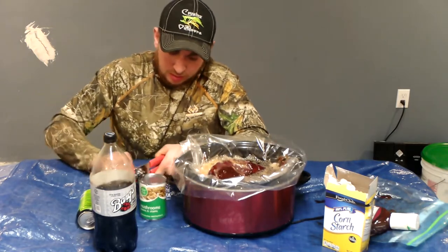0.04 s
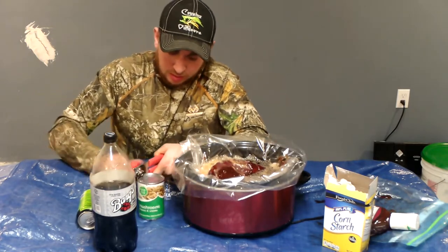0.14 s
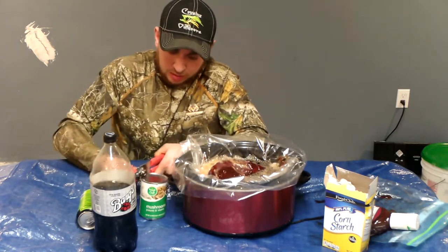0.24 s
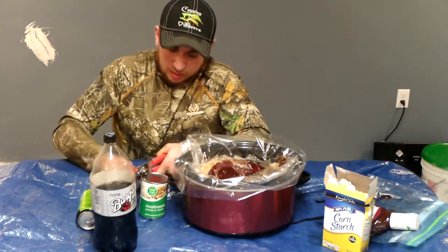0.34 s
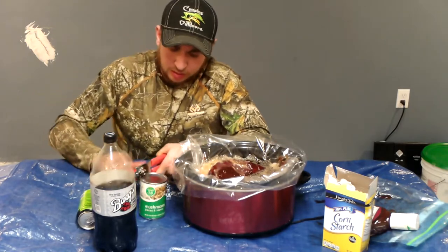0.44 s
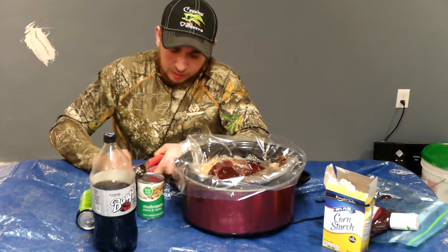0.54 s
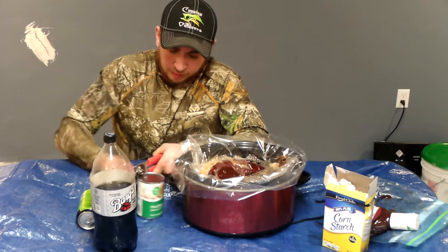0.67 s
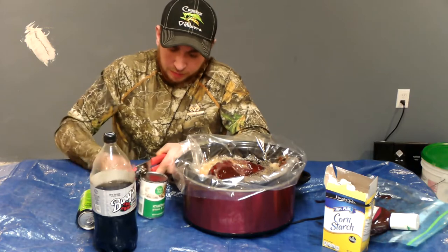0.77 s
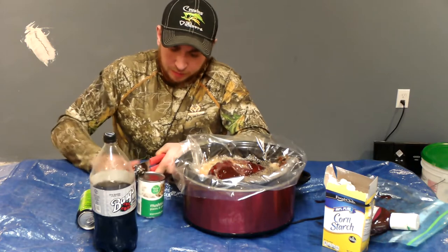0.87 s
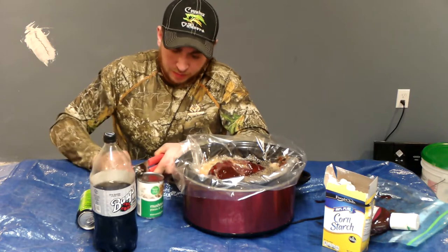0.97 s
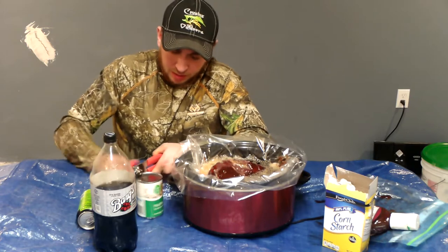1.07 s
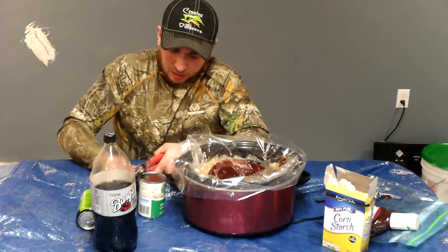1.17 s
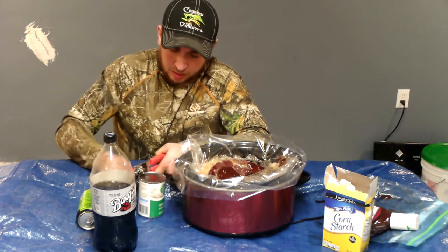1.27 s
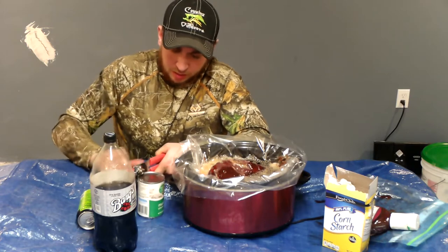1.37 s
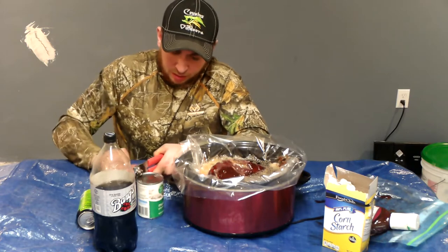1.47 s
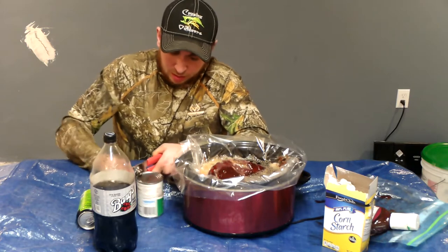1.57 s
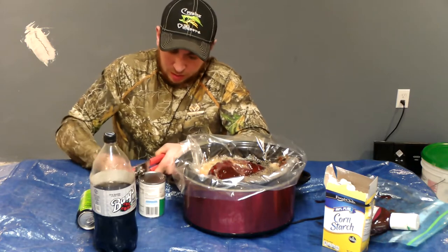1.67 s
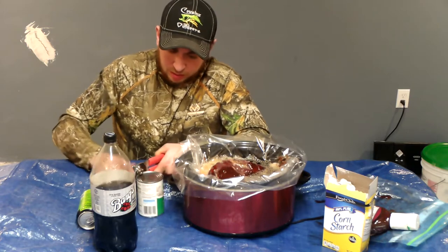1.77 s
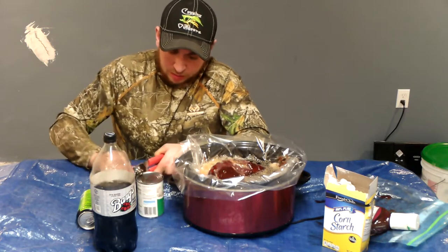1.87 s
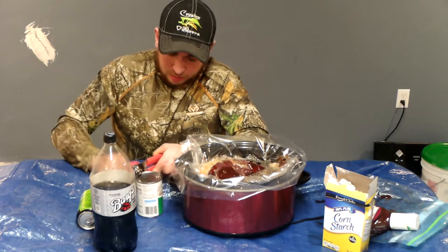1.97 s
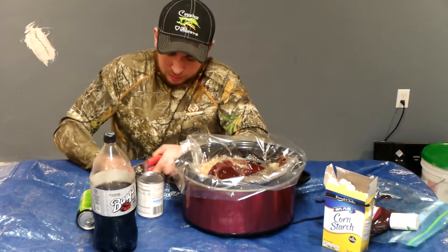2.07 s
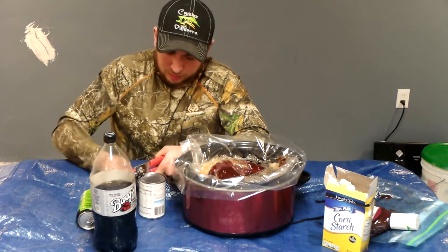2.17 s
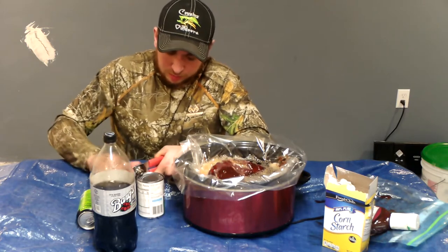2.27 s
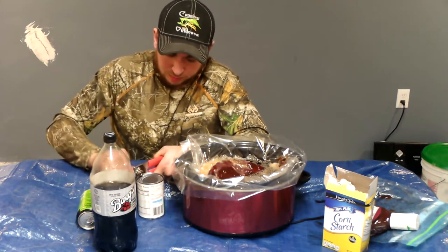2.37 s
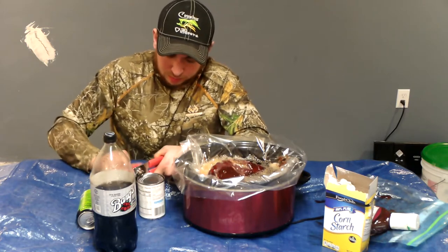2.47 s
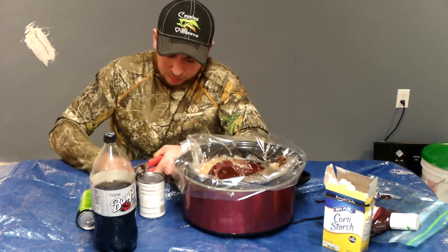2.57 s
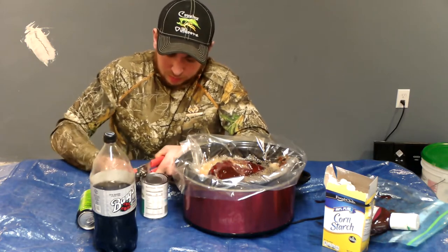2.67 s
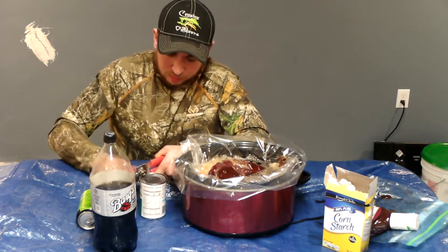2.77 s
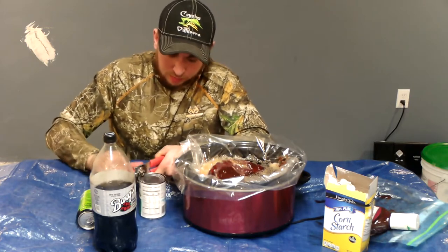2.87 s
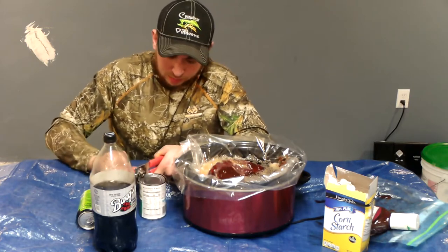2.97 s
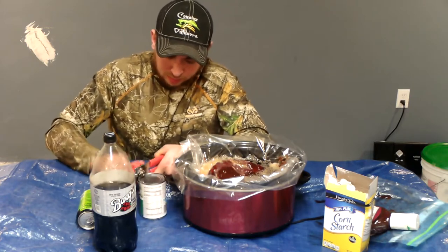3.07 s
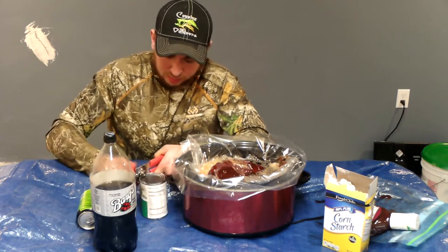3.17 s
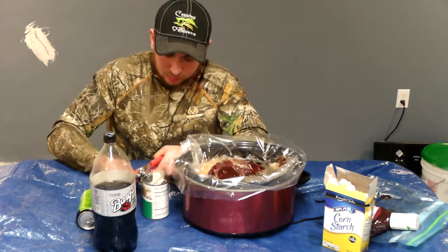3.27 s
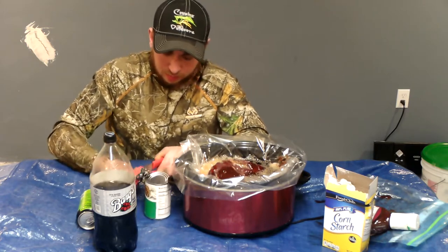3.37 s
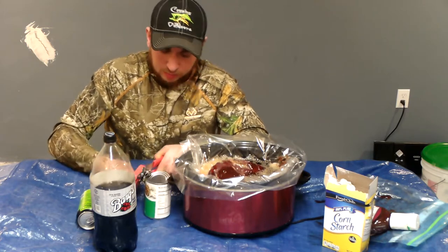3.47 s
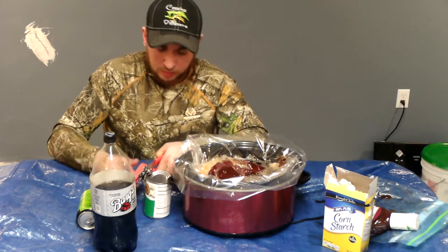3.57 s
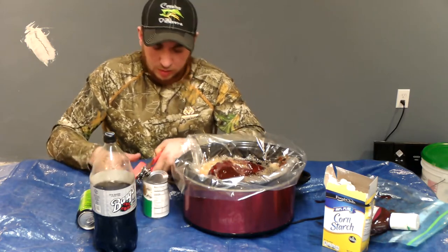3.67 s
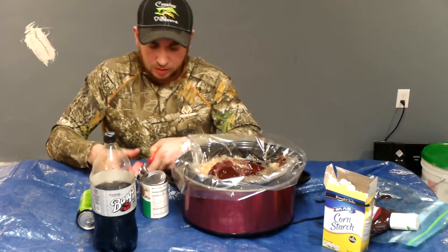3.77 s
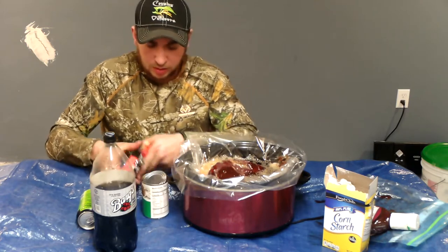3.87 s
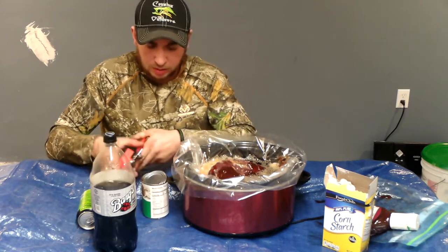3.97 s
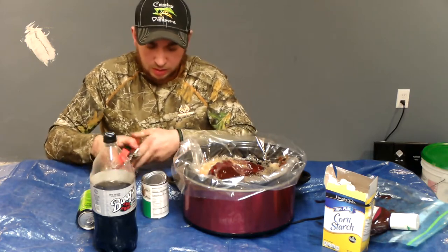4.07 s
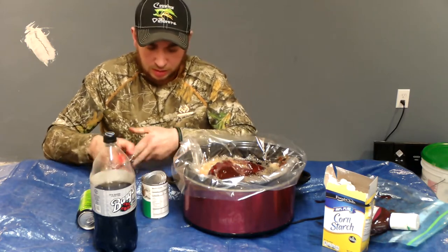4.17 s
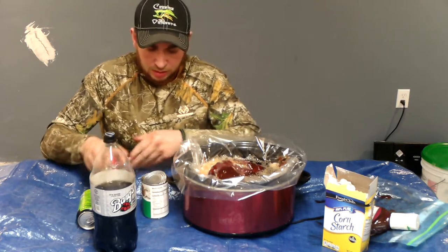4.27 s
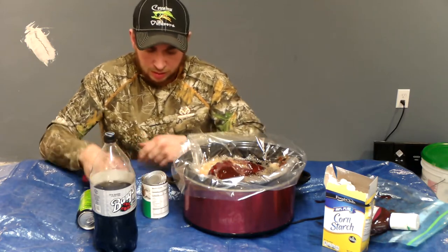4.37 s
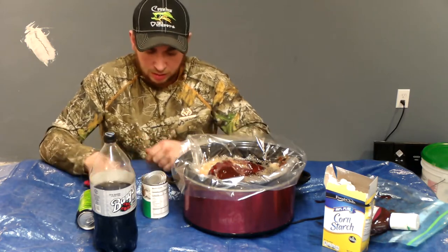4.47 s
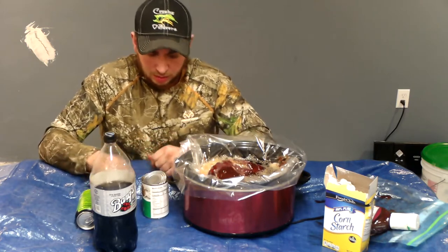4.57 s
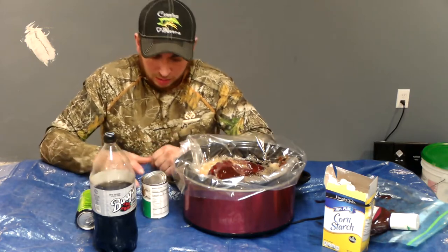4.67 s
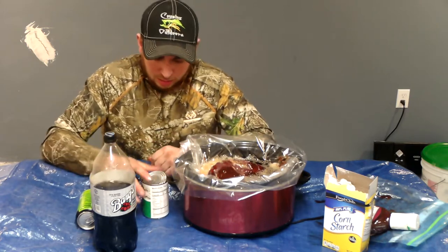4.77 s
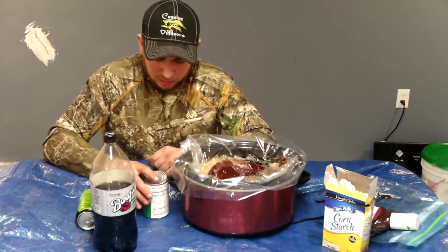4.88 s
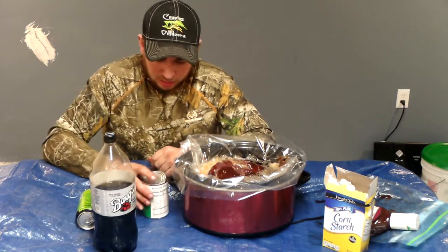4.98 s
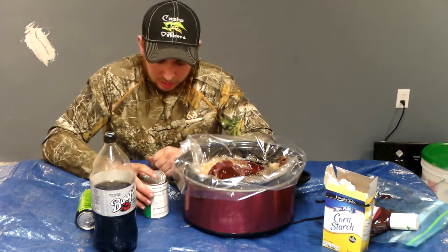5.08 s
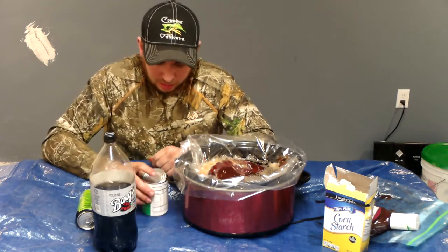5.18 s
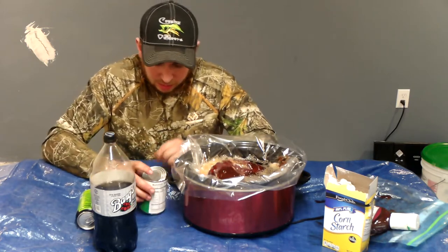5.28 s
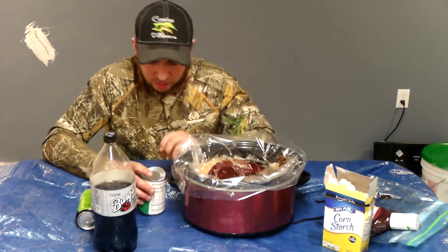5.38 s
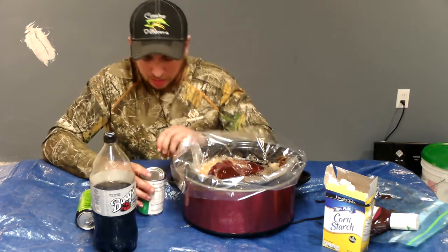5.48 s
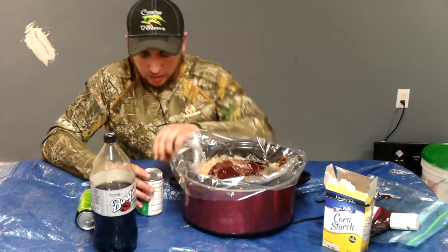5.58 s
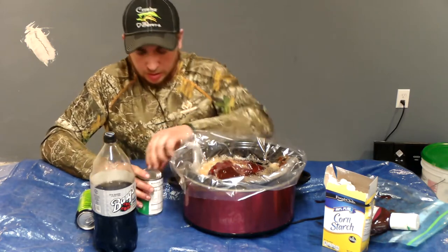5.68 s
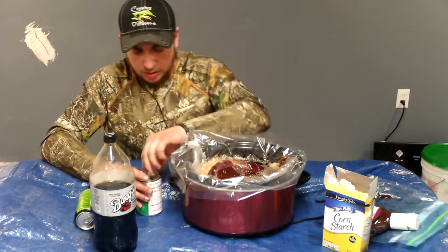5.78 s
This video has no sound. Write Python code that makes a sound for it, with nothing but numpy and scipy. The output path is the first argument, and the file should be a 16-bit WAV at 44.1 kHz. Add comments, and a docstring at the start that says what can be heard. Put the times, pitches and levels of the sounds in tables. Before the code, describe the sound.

Rhythmic metallic scrapes of a can opener cutting a lid give way to clicks, a sharp clank and crackling plastic.

```python
"""Short rasping twists of a hand can opener, heard close on one microphone in a bare, echoing room.
The wheel tears round the lid of a full tin in tiny slips that ring the lid and the wall. Each effort
shakes the light table; between twists the slack crank ticks and sleeves rustle. The lid breaks free,
the opener is unclamped, folded and dropped on the table, and a hand brushes the plastic liner of a pot."""
import sys
import numpy as np
from scipy import signal
from scipy.fft import rfft, irfft
from scipy.io import wavfile

SR = 44100
rng = np.random.default_rng(int(sys.argv[2]) if len(sys.argv) > 2 else 0)


def unload_audio(sound):
    """Save the sound as a 16-bit wav file, at the path given as the first command line argument."""
    columns = np.transpose(np.atleast_2d(sound))
    # keep every value between -1 and 1, then stretch to whole-number steps
    steps = np.round(np.clip(columns, -1, 1) * 32767)
    wavfile.write(sys.argv[1], SR, steps.astype(np.int16))


N = 257544

# Levels in the tables are relative; each source sets its own overall gain.
# Twists of the crank, the last a weak push and the lid breaking free. The lid's ring climbs as the cut
# frees it; which two wall modes stand out depends on where the wheel grips.
# full strength t/s, rise/s, hold/s, tear level/dB; lid ring f/Hz, width/Hz, level/dB;
# lower ring f/Hz, width/Hz, level/dB; then for each wall mode f/Hz, level/dB re the tear
TWISTS = [(0.0, 0.072, 0.0026, -56, 1260, 170, -43.5, 790, 324, -51, 1710, -20, 3500, -27),
          (0.302, 0.061, 0.016, -39.5, 1130, 197, -36, 690, 152, -42, 2250, -14, 1020, -7),
          (0.766, 0.091, 0.027, -42.5, 1190, 163, -31.5, 690, 110, -44, 3030, -9.5, 4640, -18.5),
          (1.219, 0.061, 0.03, -42.5, 1240, 259, -39, 657, 150, -48.5, 1440, -4, 3010, -10.5),
          (1.674, 0.052, 0.038, -42, 1199, 225, -35, 650, 333, -51.5, 1630, -5, 1910, -24),
          (2.144, 0.073, 0.031, -44, 1370, 483, -42, 506, 304, -53.5, 1206, -7.5, 3080, -20),
          (2.665, 0.057, 0.046, -49.5, 1343, 413, -43, 836, 202.3, -52, 392, -6.5, 3150, -11.5),
          (3.208, 0.041, 0.11, -61, 1720, 220, -57, 840, 483, -69, 3640, -11, 1330, -2),
          (3.385, 0.0086, 0.0046, -45.5, 1670, 258, -40, 830, 480, -50.5, 1360, 3, 3320, 0)]
# Spectrum of tearing metal: f/Hz, level/dB
TEAR_SPECTRUM = [(150, -86), (250, -11), (692, -9), (913, -3), (1180, -13.5), (1360, -64), (1920, -7.5),
                 (2950, -6), (5410, -14.5), (9890, -13.5), (15500, -35.5)]
# Efforts and knocks that shake the table: full strength t/s, rise/s, hold/s, level/dB
TABLE_PUSHES = [(0.0, .05, 0.0086, -63), (0.306, .1, 0.029, -53), (0.547, 0.075, .03, -61.5),
                (0.678, .1, 0.22, -55), (1.262, 0.14, .02, -54), (1.674, 0.14, 0.12, -51.5),
                (2.15, 0.16, 0.097, -50.5), (2.67, .07, 0.1, -51), (3.232, 0.04, 0.21, -56.5),
                (3.974, 0.087, .03, -62), (4.641, 0.033, 0.024, -37.5), (4.75, .04, .03, -48),
                (5.686, 0.17, 0.033, -70)]
# Low modes of the whole table: f/Hz, width/Hz, level/dB
SHAKE_MODES = [(62, 19, -4), (108.7, 13.5, 2), (121, 18.6, -1), (137.4, 20, -2)]
# The slack crank ticks as the hand takes a new grip: t/s, level/dB
REGRIPS = [(.134, -50), (0.596, -42), (1.071, -52), (1.528, -51), (2.065, -60), (2.473, -65)]
# The sound of that tick: lower f/Hz, upper f/Hz, upper share/dB, ring share/dB, table share/dB
REGRIP_SOUND = (3450, 7700, -8, 5, -28)
# Knocks of the opener, most as it is unclamped, folded and dropped: t/s, level/dB, then as REGRIP_SOUND
KNOCKS = [(1.115, -50, 6000, 9500, 12, -10, -30), (2.746, -54, 3150, 6600, 13, 7.5, -30),
          (3.047, -51, 1690, 3030, -11, -4, -16), (3.221, -48, 1690, 3600, -4, 13.5, -12),
          (3.324, -45.5, 3500, 6500, 3, -16, -8), (3.355, -34.5, 1690, 3640, -1, -2.5, -30),
          (3.382, -21, 1750, 5350, -5, 2.5, -47), (3.465, -27, 2100, 6040, -7, -2.5, -19.5),
          (3.596, -32.5, 825, 3440, -8, -19, -12), (3.729, -40, 2900, 6360, -4.5, 3, -18),
          (3.834, -52, 3820, 7170, -7, -6, -16), (3.925, -37, 2680, 5750, -3.5, 5, -5.5),
          (3.998, -42, 2440, 4470, -2, -13, -4), (4.057, -44, 1800, 3650, 2, -10, -20),
          (4.095, -38.5, 2630, 3670, -2.5, -2.5, -16.5), (4.133, -44, 2880, 6300, 3.5, 7, -29),
          (4.166, -35, 2990, 8600, -24, -18, -21.5), (4.265, -48, 3700, 7300, -19, 11.5, -41),
          (4.272, -27, 3300, 7500, -1, 1, -38), (4.527, -25.5, 1950, 6780, -3.5, 6, -19),
          (4.536, -31, 1070, 3470, 4, -1, -19), (4.6304, -27, 2620, 7000, -4, -7, -14),
          (4.634, -12.5, 1980, 6040, -4.5, -4.5, 4), (4.931, -40.5, 1070, 3500, -4, -12, 2),
          (4.984, -43.5, 2000, 5060, -4, -13, -17), (5.057, -47, 3560, 7500, -3, -8, -21),
          (5.17, -60.5, 1450, 4000, 1, -16, -20), (5.257, -57, 1460, 3630, -4, -23, -21),
          (5.331, -54, 3080, 8850, 6.5, 7, -38), (5.433, -57, 3570, 7700, 9.5, -12, -28),
          (5.513, -56, 3600, 8830, 11, -14, -24)]
# Modes of the opener: f/Hz, level/dB, t60/s
OPENER_MODES = [(1070, 7, 0.12), (1410, -6, 0.051), (1690, -12.5, 0.073), (2040, 5, 0.016),
                (2320, -2, 0.027), (2870, -1.5, 0.025), (3030, -13, .03), (3560, -1, 0.018),
                (3680, -2, 0.03), (3870, -2, 0.029), (5000, -1, .015), (5750, 2.5, 0.0115),
                (6350, 3.5, 0.011), (7130, 4.5, 0.0092), (7500, 6, 0.01), (7840, -1, .01), (9900, -7, .01)]
# Modes of the table top: f/Hz, level/dB, t60/s
TABLE_TOP_MODES = [(398, -7, 0.084), (458, -4, 0.059), (612, 2, 0.023), (690, 2, 0.092), (753, 4.5, 0.037),
                   (873, 6, 0.025), (1014, -14, 0.069)]
# Hands and sleeves moving about once the lid is free: t/s, level/dB
HAND_MOVES = [(3.4, -67), (3.52, -47.5), (3.98, -54), (4.12, -44.5), (4.38, -40), (4.6, -84), (4.7, -39.5),
              (5.3, -68), (5.5, -58)]
# Spectrum shared by cloth and plastic: f/Hz, level/dB
RUSTLE_SPECTRUM = [(120, -56), (200, -18), (392, -2.5), (454, -15), (497, 3.5), (575, -11), (783, -4.5),
                   (4330, -7), (9830, -2), (15500, -23)]
# The hand brushing the liner: t/s, level/dB
LINER_BRUSH = [(5.5, -81), (5.51, -71.5), (5.612, -41.5), (5.65, -42.5), (5.726, -50), (5.77, -36),
               (5.79, -51.5), (5.84, -42.5)]
# Single snaps of the liner: t/s, level/dB
LINER_SNAPS = [(5.5648, -37), (5.5924, -40), (5.615, -26), (5.6526, -26), (5.6816, -29), (5.751, -26),
               (5.7643, -22)]
# Room tone at the microphone: f/Hz, level/dB
ROOM_TONE_SPECTRUM = [(15, -20.5), (25, 7), (66, -14), (156, 1.5), (537, 0), (648, -5), (1200, -6.5),
                      (3260, -15), (5010, -21.5), (9550, -22.5), (15500, -28)]
# Decay of the bare room: f/Hz, t60/s
ROOM_T60 = [(90, 0.22), (250, 0.54), (700, 0.7), (2000, 0.67), (6000, 0.59), (12000, 0.17)]
# Echoes off the nearest walls: t/s after the direct sound, level/dB
WALL_ECHOES = [(.008, -14), (0.0201, -7.5)]


def from_db(db):
    """Decibels to gain."""
    return 10 ** (np.asarray(db) / 20)


def unit_power(x):
    """Scale to a mean square of one."""
    return x / np.sqrt(np.mean(x ** 2) + 1e-20)


def envelope(points, fade_s=0.0086):
    """Gain through (t/s, level/dB) points, fading to silence outside them."""
    times, levels = np.transpose(points)
    t = np.arange(N) / SR
    gate = np.clip(np.minimum(t - times[0] + fade_s, times[-1] + fade_s - t) / fade_s, 0, 1)
    return gate * from_db(np.interp(t, times, levels))


def stroke(s, rise, hold, db, rise_db=24, fall_db_per_s=450):
    """Gain of one effort: a rise straight in dB up to time s, a hold, a steady fall."""
    t = np.arange(N) / SR - s
    level_db = db + np.minimum(rise_db * t / rise, 0) - fall_db_per_s * np.maximum(t - hold, 0)
    return from_db(np.maximum(level_db, -200))


def at_hz(points, hz):
    """Read a table on a log-frequency axis."""
    freqs, values = np.transpose(points)
    return np.interp(np.log(hz), np.log(freqs), values)


def colour(x, spectrum):
    """Give a white signal a spectrum; unit power."""
    hz = np.maximum(np.fft.rfftfreq(len(x), 1 / SR), 1)
    return unit_power(irfft(rfft(x) * from_db(at_hz(spectrum, hz)), len(x)))


def bandpass(x, low_hz, high_hz):
    """A band with gentle skirts."""
    return signal.sosfilt(signal.butter(2, [low_hz, high_hz], "band", fs=SR, output="sos"), x)


def resonate(x, hz, width_hz):
    """Resonance that keeps the power of white noise."""
    r = np.exp(-np.pi * width_hz / SR)
    b = np.sqrt((1 - r * r) / 2) * np.array([1, 0, -1])
    return signal.lfilter(b, [1, -2 * r * np.cos(2 * np.pi * hz / SR), r * r], x)


def ring(x, hz, t60):
    """A unit click sets a sine of height 1 ringing."""
    r, w = from_db(-60 / (t60 * SR)), 2 * np.pi * hz / SR
    return signal.lfilter([0, np.sin(w)], [1, -2 * r * np.cos(w), r * r], x + 1e-18)


def grains(per_s, uneven_db):
    """Random clicks of uneven size; unit power."""
    sizes = from_db(uneven_db * np.minimum(rng.exponential(1, N), 4)) * rng.choice([-1, 1], N)
    return unit_power(sizes * (rng.random(N) < per_s / SR))


def lid_tearing():
    """The wheel tears the lid in a dense run of slips that drive the lid, the tin's wall and the air."""
    lid_lead_s, lower_lag_s = 0.015, 0.0037   # the lid rings ahead of the tear, the lower ring after it
    slips = grains(per_s=2200, uneven_db=2.0)
    tear = colour(slips, TEAR_SPECTRUM)
    out = np.zeros(N)
    for s, rise, hold, tear_db, lid_hz, lid_width, lid_db, low_hz, low_width, low_db, *wall in TWISTS:
        span = slice(max(round((s - .15) * SR), 0), round((s + .35) * SR))
        tear_gain = stroke(s, rise, hold, tear_db)[span]
        lid_gain = stroke(s - lid_lead_s, rise, hold, lid_db, rise_db=39.5)[span]
        low_gain = stroke(s + lower_lag_s, rise, hold, low_db)[span]
        out[span] += tear_gain * tear[span]
        lid = resonate(lid_gain * slips[span], lid_hz, lid_width)
        out[span] += resonate(lid, lid_hz, lid_width) * np.sqrt(6 * lid_width / SR)   # twice: steep skirts
        out[span] += resonate(low_gain * slips[span], low_hz, low_width)
        for hz, db in np.reshape(wall, (2, 2)):
            out[span] += from_db(db) * resonate(tear_gain * slips[span], hz, width_hz=60 + 0.01 * hz)
    return from_db(-3) * out


def table_shake():
    """The light table rumbles in its low modes, swelling under each effort and knock."""
    noise = rng.standard_normal(N)
    pushes = [stroke(*push, rise_db=23.5, fall_db_per_s=142) for push in TABLE_PUSHES]
    effort = from_db(-71) + np.max(pushes, axis=0)   # never quite at rest
    rumble = sum((-1) ** k * from_db(db) * resonate(noise, hz, width)
                 for k, (hz, width, db) in enumerate(SHAKE_MODES))
    return effort * unit_power(rumble)


def table_top(blow):
    """The struck table top rings low and short, and radiates little below its first mode."""
    rings = sum(from_db(db) * ring(blow, hz, t60) for hz, db, t60 in TABLE_TOP_MODES)
    return signal.sosfilt(signal.butter(4, 340, "high", fs=SR, output="sos"), rings)


def opener_knocks():
    """Each blow rattles the loose parts round two pitches, and rings nearby opener modes and the table."""
    rattle_rise_s, rattle_decay_s, rattle_db = 0.0019, 0.0056, 15
    out, size = np.zeros(N), SR // 5
    t = np.arange(size) / SR
    click = (t == 0) * 1.0
    contacts = [(*grip, *REGRIP_SOUND) for grip in REGRIPS] + KNOCKS
    for s, db, low_hz, high_hz, high_db, ring_db, table_db in contacts:
        rattle = rng.standard_normal(size) * np.exp(-t / rattle_decay_s) * np.minimum(t / rattle_rise_s, 1)
        crack = click + from_db(rattle_db) * rattle / np.sqrt(np.sum(rattle ** 2))
        hit = from_db(table_db) * table_top(click)
        for hz, band_db, sign in (low_hz, 0, 1), (high_hz, high_db, -1):   # opposite signs join the bands
            band = bandpass(crack, hz / 1.6, min(hz * 1.6, 10500))
            hit += sign * from_db(band_db + 17) * band * np.sqrt(1000 / hz)
        for mode_hz, mode_db, t60 in OPENER_MODES:
            nearness = from_db(-6 * (np.log2(mode_hz / low_hz) / 0.25) ** 2)
            nearness += from_db(high_db - 6.5 * (np.log2(mode_hz / high_hz) / 0.12) ** 2)
            hit += nearness * from_db(mode_db + ring_db) * ring(click, mode_hz, t60)
        start = round(s * SR)
        out[start:start + size] += from_db(db - 11.5) * hit[:N - start]
    return out


def sleeve_rustle():
    """Cloth and skin rub in fine grains as the arm comes back after a full twist, then as the hands move."""
    lag_s = 0.087
    arm_returns = sum(stroke(s + lag_s, rise=0.15, hold=0.17, db=-48, rise_db=14, fall_db_per_s=100)
                      for s, *_ in TWISTS[1:7])
    cloth = colour(grains(per_s=3600, uneven_db=3.0), RUSTLE_SPECTRUM)
    return from_db(-16) * (arm_returns + envelope(HAND_MOVES)) * cloth


def liner_crackle():
    """Thin plastic crackles under the hand, with a few louder snaps."""
    crackle = from_db(-2) * envelope(LINER_BRUSH) * grains(per_s=4500, uneven_db=3.5)
    for s, db in LINER_SNAPS:
        crackle[round(s * SR)] += from_db(db)
    return colour(crackle, RUSTLE_SPECTRUM) * np.sqrt(np.mean(crackle ** 2))


def bare_room(x):
    """The microphone gets the direct sound, the nearest walls and a tail that dies octave by octave."""
    tail_db, onset_s = 1.5, 0.0044
    scatter_db, scatter_s = 2, 0.0067   # early scatter off the things on the table
    t = np.arange(SR) / SR
    tail = np.zeros(SR)
    for low_hz in 45 * 2.0 ** np.arange(9):
        octave = bandpass(rng.standard_normal(SR), low_hz, min(2 * low_hz, .45 * SR))
        tail += octave * from_db(-60 * t / at_hz(ROOM_T60, low_hz * np.sqrt(2)))
    tail *= 1 - np.exp(-t / onset_s)
    tail *= 1 + from_db(scatter_db) * np.exp(-t / scatter_s)
    response = from_db(tail_db) * tail / np.sqrt(np.sum(tail ** 2))
    response[0] += 1   # direct sound
    for s, db in WALL_ECHOES:
        response[round(s * SR)] += from_db(db)
    return signal.fftconvolve(x, response)[:N]


def scene():
    """Mono, by the table: tin, opener and liner echo in the room, over shake, rustle and room tone."""
    room_tone = from_db(-62) * colour(rng.standard_normal(N), ROOM_TONE_SPECTRUM)
    close_sounds = lid_tearing() + opener_knocks() + liner_crackle()
    return (bare_room(close_sounds) + table_shake() + sleeve_rustle() + room_tone)[None]


def record(dry):
    """The microphone signal loses its highest treble to a steep low-pass."""
    cutoff_hz = 15680
    return signal.sosfilt(signal.ellip(12, .5, 70, cutoff_hz, fs=SR, output="sos"), dry)


dry = scene()
out = record(dry)
unload_audio(out)
```